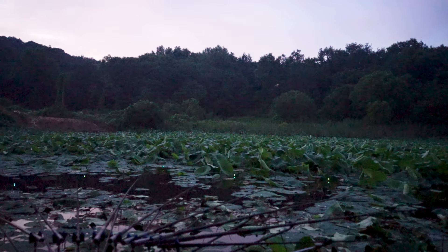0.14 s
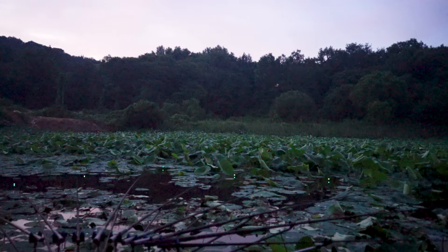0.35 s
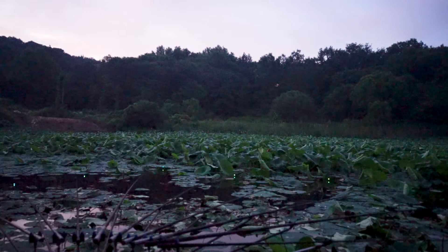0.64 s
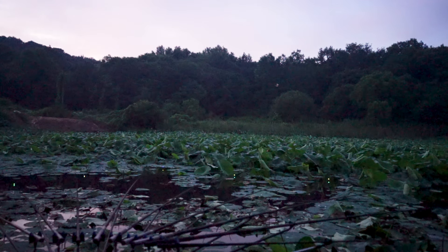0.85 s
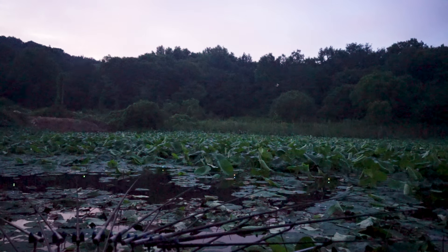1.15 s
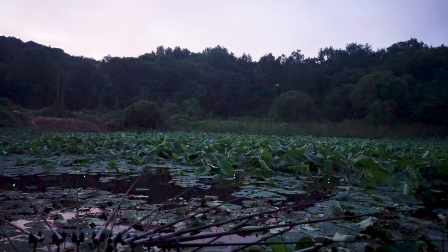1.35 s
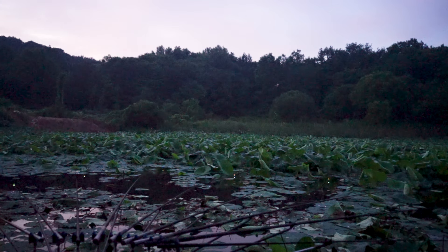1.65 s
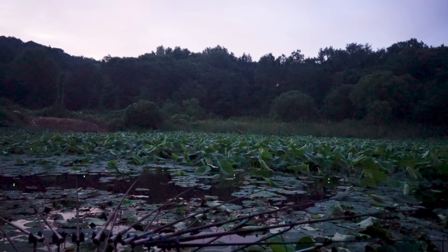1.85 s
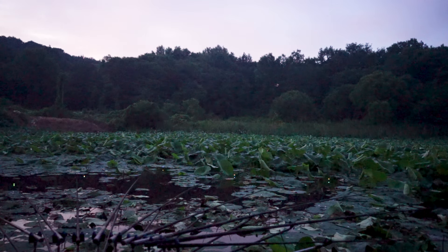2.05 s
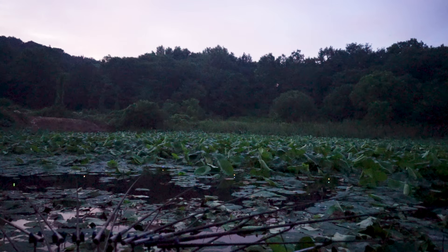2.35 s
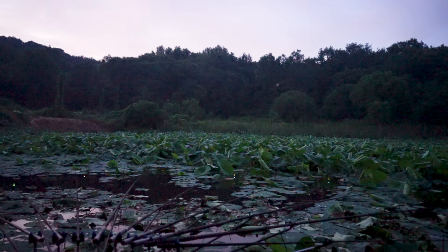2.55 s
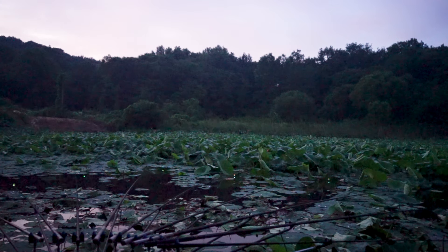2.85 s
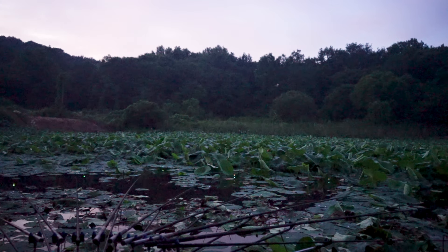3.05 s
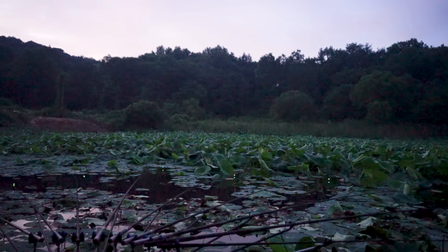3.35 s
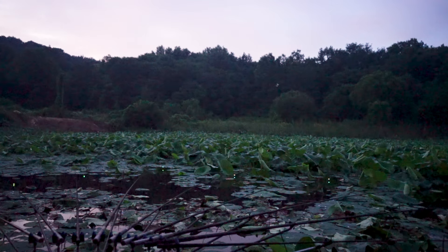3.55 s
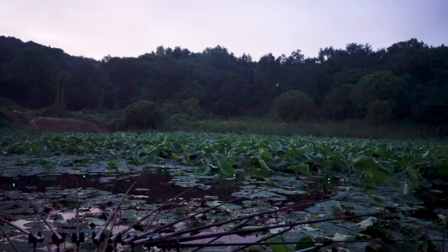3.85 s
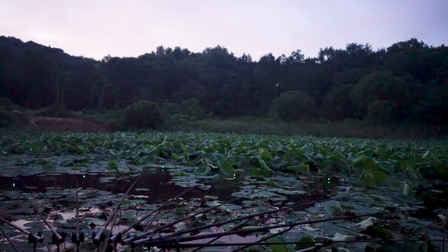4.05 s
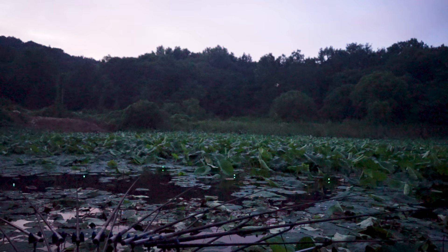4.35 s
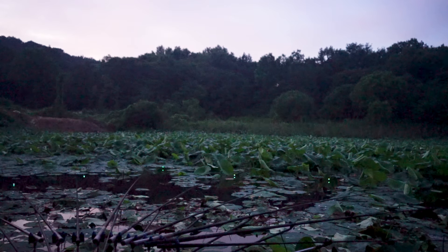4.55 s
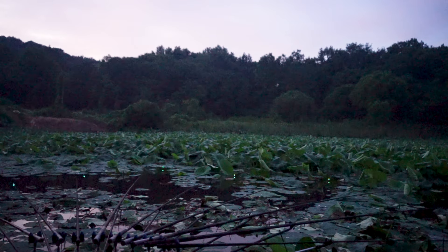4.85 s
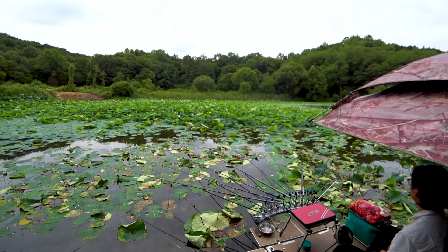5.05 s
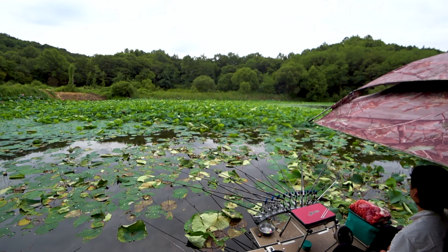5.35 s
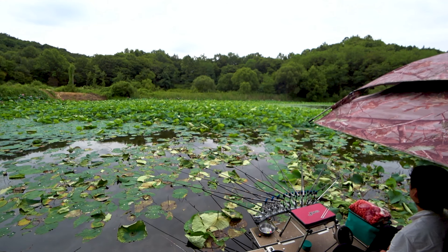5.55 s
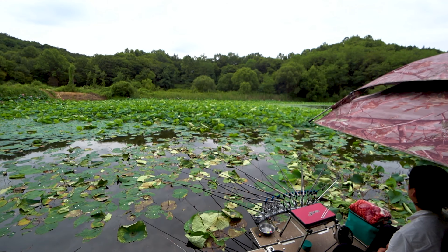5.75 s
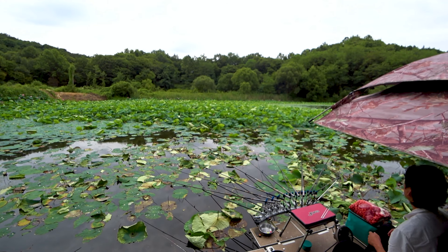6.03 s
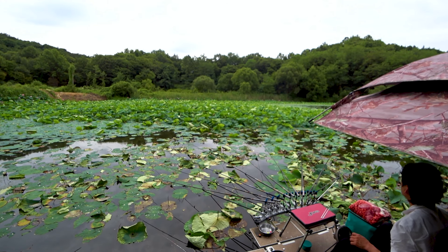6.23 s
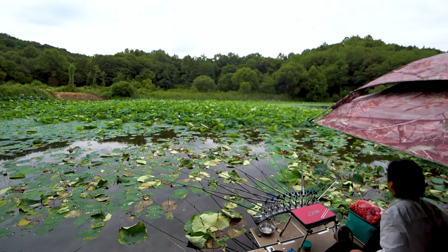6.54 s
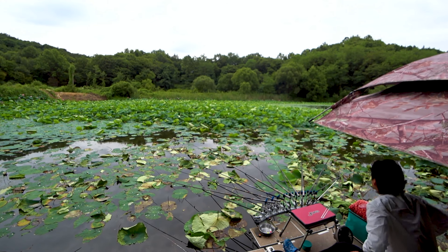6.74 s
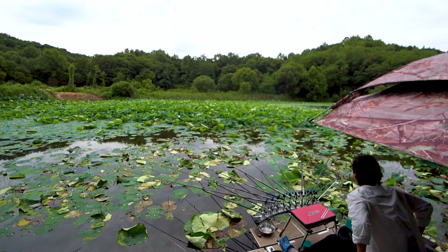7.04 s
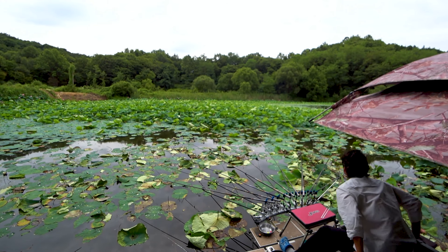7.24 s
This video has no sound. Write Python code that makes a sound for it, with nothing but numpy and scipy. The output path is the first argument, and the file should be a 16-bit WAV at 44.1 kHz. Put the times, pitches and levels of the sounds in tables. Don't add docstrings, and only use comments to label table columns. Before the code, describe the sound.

A quiet lily pond among wooded hills, heard in open stereo with short blurred echoes from trees and banks. From 0 to 0.8 s a near thrush, slightly left, gives a rattle, a falling slur and two bright hoarse chirps, with thin whistles around it. At 1.1 s a buzzing call stutters downward; from 1.5 to 2.9 s sharp dry ticks repeat on the left while raspy, warbled calls and piping whistles overlap. Around 3.5 to 4.3 s the thrush returns more softly with rattle, slur and chirps. A weaker buzz comes at 4.6 s, then sparse far whistles and faint cricket chirps. From 5.9 s handled gear makes small clicks and rustles, denser near 7 s; a two-note whistle calls at 6.7 and 7.1 s. Throughout, low hum, faint throbbing insects, far twitter and fading hiss; traffic slowly nears.

```python
import sys
import numpy as np
from scipy import signal
from scipy.fft import rfft, irfft, next_fast_len
from scipy.io import wavfile
from scipy.ndimage import uniform_filter1d

SR = 44100
rng = np.random.default_rng(int(sys.argv[2]) if len(sys.argv) > 2 else 0)


def linear_from_db(decibels):
    return 10 ** (np.asarray(decibels, float) / 20)


def inscribe(sig):
    pcm = np.round(np.clip(np.atleast_2d(sig).T, -1, 1) * 32767)
    wavfile.write(sys.argv[1], SR, pcm.astype(np.int16))


N = 325899
T = np.arange(N) / SR

# multiple, level_db
CLEAR_OVERTONES = [(2, -27.5), (3, -39), (4, -30.5), (5, -27.5)]


def rms_one(x):
    return x / np.sqrt(np.mean(x ** 2) + 1e-20)


def drift(rate_hz, size=N):
    r = np.exp(-2 * np.pi * rate_hz / SR)
    noise = rng.standard_normal(size + 4000)
    return rms_one(signal.lfilter([1], [1, -2 * r, r * r], noise)[4000:])


def ring(x, hz, width_hz):
    r = np.exp(-np.pi * width_hz / SR)
    zeros = np.array([1, 0, -1]) * (1 - r * r) / 2
    return signal.lfilter(zeros, [1, -2 * r * np.cos(2 * np.pi * hz / SR), r * r], x)


def running_phase(hz):
    return 2 * np.pi * np.cumsum(hz) / SR


def add(track, start_s, sound):
    i = round(start_s * SR)
    track[i:i + len(sound)] += sound[:N - i]


def whistles(notes, swell, overtones=(), hoarse_hz=0):
    out = np.zeros(N)
    shake_hz = hoarse_hz * drift(90)
    for start_s, length_s, first_hz, middle_hz, last_hz, level_db in notes:
        u = np.linspace(0, 1, round(length_s * SR))
        bend = np.polyfit([0, .5, 1], [first_hz, middle_hz, last_hz], 2)
        phase = running_phase(np.polyval(bend, u))
        rough = phase + running_phase(np.resize(shake_hz[round(start_s * SR):], len(u)))
        tone = np.sin(.85 * phase + .15 * rough)
        tone = tone + sum(linear_from_db(db) * np.sin(round(k) * rough) for k, db in overtones)
        add(out, start_s, linear_from_db(level_db) * np.sin(np.pi * u).clip(0) ** swell * tone)
    return out


def glides(rows, early=.61):
    return [(s, length, a, a + early * (b - a), b, db) for s, length, a, b, db in rows]


def sung(motif, times):
    return [(s + at, *pitch, db + loud) for at, loud in times for s, *pitch, db in motif]


def crested(rows, climb, tip, crest, octave_db=-40):
    out = np.zeros(N)
    for start_s, length_s, crest_hz, level_db in rows:
        u = np.linspace(0, 1, round(length_s * SR))
        rise = climb * np.abs(1 - u / crest) ** 2.2
        fall = tip * ((u - crest) / (1 - crest)) ** 2
        phase = running_phase(crest_hz * (1 - np.where(u < crest, rise, fall)))
        swell = np.sin(np.pi * u ** 0.82).clip(0) ** 0.44
        add(out, start_s, linear_from_db(level_db) * swell * (np.sin(phase) + linear_from_db(octave_db) * np.sin(2 * phase)))
    return out


def warbles(tables, rate_hz, uneven, low_db, overtones, higher=1, wider=1):
    out = np.zeros(N)
    for rows in tables:
        s, centre_hz, swing_hz, level_db = np.transpose(rows)
        t = np.arange(s[0], s[-1], 1 / SR)
        shake = np.cos(running_phase(rate_hz * (1 + uneven * drift(56.9, size=len(t)))))
        shake = np.tanh(0.87 * shake)
        centre = higher * np.interp(t, s, centre_hz)
        phase = running_phase(centre + wider * np.interp(t, s, swing_hz) * shake)
        tone = np.sin(phase) + sum(linear_from_db(db) * np.sin(round(k) * phase) for k, db in overtones)
        loud_db = np.interp(t, s, level_db) - low_db * shake + 2.9 * drift(70, size=len(t))
        add(out, s[0], linear_from_db(loud_db) * tone)
    return out


def among_trees(x, lean_db, lag_s, wet_db, t60, echo_db, shadow_db=0, echoes=None, blur=.15, dull_db=0):
    # delay_s, level_db
    pond_echoes = [(.007, 4.5), (0.012, 3), (0.027, -3.5), (0.039, -6), (0.059, -9.5), (.125, -9)]
    t = np.arange(SR) / SR
    scatter = rng.standard_normal((2, SR)) * linear_from_db(3 * rng.exponential(1, (2, SR)).clip(0, 4))
    tail = scatter * linear_from_db(-60 * t / t60) * (1 - np.exp(-t / 0.0003))
    path = linear_from_db(wet_db) * tail / np.sqrt(np.sum(tail ** 2, axis=1, keepdims=True))
    for delay_s, db in pond_echoes if echoes is None else echoes:
        cluster = scatter * np.exp(-((t - delay_s) / (blur * delay_s)) ** 2)
        path += linear_from_db(db + echo_db) * cluster / np.sqrt(np.sum(cluster ** 2, axis=1, keepdims=True))
    size = next_fast_len(N + SR)
    hz = np.arange(size // 2 + 1) * SR / size
    direct = np.exp(-2j * np.pi * hz * np.array([[0], [lag_s]]))
    leaves = linear_from_db(-dull_db * ((hz - 2300) / 800).clip(0, 1))
    lean = lean_db + shadow_db * (hz / 13000).clip(0, 1) ** 2
    path = (direct + leaves * rfft(path, size)) * linear_from_db(lean * np.array([[.5], [-.5]]))
    return irfft(rfft(x, size) * path, size)[:, :N]


def bed(spectrum, level_db, patchy_db):
    # pitch_hz, left_right_likeness
    likeness = [(60, 0.35), (130, 0.54), (290, 0.37), (640, 0.51), (1410, 0.3), (3100, 0.0013),
                (6820, 0.12), (15000, 0.078)]
    like_hz, like = np.transpose(likeness)
    point_hz, point_db = np.transpose(spectrum)
    out, white = 0, rng.standard_normal((2, 2, N))
    edges = point_hz[0] * 2 ** np.arange(0, np.log2(point_hz[-1] / point_hz[0]) + .2, 1 / 3)
    for k, (low, high) in enumerate(zip(edges, edges[1:])):
        band = signal.butter(2, [low, high], "band", fs=SR, output="sos")
        mid, side = signal.sosfilt(band, white[k % 2])
        log_hz = np.log(np.sqrt(low * high))
        alike = np.clip(np.interp(log_hz, np.log(like_hz), like), -1, 1)
        flicker_db = patchy_db * drift(22 * 16, size=N // 16 + 2)
        gain = linear_from_db(np.interp(log_hz, np.log(point_hz), point_db) + flicker_db)
        gain = np.interp(T * SR / 16, np.arange(len(gain)), gain)
        out = out + gain * (np.sqrt(1 + alike) * mid + np.sqrt(1 - alike) * side * [[1], [-1]])
    return linear_from_db(level_db) * rms_one(out)


def air(dawn_db, nearing_db, chorus_db):
    # pitch_hz, level_db per Hz
    rumble_bands = [(15, -49), (25, -22), (49, -13.5), (92, -5), (198, -6), (500, -9), (650, -4.5),
                    (1100, -120)]
    traffic_bands = [(240, -8), (400, -4), (611, -1.5), (927, 6.5), (1540, -1.5), (1900, 2), (2470, -37),
                     (4180, -120)]
    chorus_bands = [(1700, -25), (2250, 7.5), (3590, 0.5), (4200, 0), (5190, -5), (6530, -0.5), (9000, -80),
                    (11700, -49)]
    hiss_bands = [(4410, -35), (7500, -12), (8400, -8.5), (12200, -12.5), (14700, -11), (16200, -20)]
    rumble_db = -56.5 + 1.07 * dawn_db
    hiss_db = -57 + 2.05 * dawn_db + 2.47 * nearing_db
    out = bed(rumble_bands, rumble_db, 0.22) * linear_from_db([[1.2], [-1.2]])
    out = out + bed(traffic_bands, -59.5 + nearing_db, 0.91)
    out = out + bed(chorus_bands, chorus_db - 2.1, 3.47) * linear_from_db([[.8], [-.8]])
    out = out + bed(hiss_bands, hiss_db, 0.57)
    return out + linear_from_db(rumble_db - 8 + 2.5 * drift(4)) * np.sin(2 * np.pi * 97 * T)


def twitter(level_db):
    notes = []
    for when, pitch, bend, length, soft in rng.random((400, 5)):
        hz = 2300 * 2 ** (.6 * pitch)
        b = 1 + .2 * (bend - .7)
        notes.append((7.3 * when, .03 + .05 * length, hz, hz * b, hz * b ** 1.6, -8 * soft))
    return linear_from_db(level_db) * rms_one(whistles(notes, 0.22))


def katydids():
    throb = np.clip(np.sin(2 * np.pi * 25.5 * T) + .1, 0, 1) * linear_from_db(3 * drift(1.2))
    low, high = [rms_one(ring(ring(rng.standard_normal(N), hz, 260), hz, 260)) for hz in (4900, 12900)]
    return linear_from_db(-55 - .6 * T) * throb * low + linear_from_db(-73 - 1.2 * T) * high


def rustles():
    # start_s, peak_db, centre_hz, length_s
    touches = [(1.281, -33, 566, 0.028), (1.488, -44, 3500, 0.0094), (5.931, -37.5, 2940, 0.022),
               (5.932, -40, 890, 0.047), (5.967, -50, 5800, .005), (6.013, -43, 5100, 0.005),
               (6.302, -39, 970, 0.0084), (6.563, -45, 1170, 0.021), (6.654, -37, 2360, 0.012),
               (6.922, -37.5, 4700, 0.023), (6.949, -32, 4740, 0.0044), (7.003, -36, 6000, 0.0044),
               (7.014, -30, 2660, 0.011), (7.117, -34.5, 4430, 0.018), (7.285, -37.5, 437, 0.023),
               (7.286, -33.5, 3160, 0.0061), (7.36, -42, 4000, 0.005)]
    out = np.zeros(N)
    u = np.arange(4000) / SR
    for start_s, peak_db, hz, length_s in touches:
        grains = rng.standard_normal(4000) * linear_from_db(2 * rng.exponential(1, 4000))
        grains = grains * np.exp(-(u / length_s) ** 2)
        burst = ring(ring(grains, hz, 1.25 * hz), hz, 1.25 * hz)
        add(out, start_s, linear_from_db(peak_db) * burst / np.sqrt(np.sum(burst ** 2) / (length_s * SR)) / 4)
    return out


def ticks():
    # start_s, level_db
    tick_times = [(1.514, -25.5), (1.6672, -39), (1.86, -25), (1.959, -40), (2.141, -25.5), (2.28, -38.5),
                  (2.47, -28), (2.5698, -40), (2.7437, -27.5), (2.847, -40), (6.742, -41.5), (7.06, -42),
                  (7.323, -46)]
    snaps = np.zeros(N) + 1e-18
    u = np.arange(60)
    for start_s, level_db in tick_times:
        add(snaps, start_s, [linear_from_db(level_db + 20.5)])
        add(snaps, start_s + .003, linear_from_db(level_db + 8.5) * rng.standard_normal(60) * np.exp(-u / 25))
    return ring(snaps, 10460, 2140) + 0.17 * ring(snaps, 21000, 3000)


def right_bank():
    # start_s, length_s, first_hz, last_hz, peak_db
    glide_rows = [(3.255, 0.037, 2680, 2360, -60), (3.185, 0.023, 2000, 1830, -56),
                  (3.4, 0.0078, 3000, 2160, -64), (5.4, 0.068, 1970, 2176, -57),
                  (5.46, 0.063, 2400, 1880, -55.5), (5.6, 0.059, 3650, 3680, -59),
                  (6.25, 0.055, 2760, 2383, -52), (2.04, 0.1, 2687, 2387, -35.5),
                  (2.385, 0.043, 2904, 1977, -36.5), (2.44, 0.035, 2257, 2096, -38),
                  (3.3, 0.12, 8300, 8300, -56), (3.47, 0.038, 6400, 3800, -50),
                  (4.85, 0.091, 3800, 4730, -48.5), (4.88, 0.089, 3760, 2950, -44.5),
                  (4.96, 0.13, 3010, 2630, -44), (5.235, 0.072, 1957, 2970, -48),
                  (5.285, 0.027, 2915, 2300, -42), (5.3, 0.066, 2290, 2050, -48),
                  (5.642, 0.0107, 6600, 4970, -44.5), (5.652, 0.011, 5300, 5100, -45),
                  (6.56, 0.058, 4010, 4460, -60), (5.66, 0.11, 3180, 2640, -49.5),
                  (6.11, 0.066, 2926, 2640, -48), (6.27, .04, 2545, 2490, -55),
                  (4.67, 0.054, 2300, 1880, -48.5), (1.92, 0.056, 4340, 4400, -45),
                  (1.99, 0.063, 4550, 4560, -57)]
    # start_s, length_s, crest_hz, peak_db
    far_hoops = [(.5, 0.13, 6020, -43), (3.09, 0.17, 6080, -48), (6.065, 0.16, 6150, -60)]
    # start_s, level_db
    cricket_times = [(5.43, -65), (5.86, -65), (6.4, -66)]
    cricket = sung([(0, .093, 11300, 11300, 0)], cricket_times)
    out = whistles(glides(glide_rows + cricket), 0.18)
    out += crested(far_hoops, .3, .32, .7)
    return out * linear_from_db(3.5 * drift(60) - 1)


def left_bank():
    # start_s, length_s, first_hz, last_hz, peak_db
    glide_rows = [(.17, 0.11, 3860, 4470, -47), (.25, 0.035, 1950, 1770, -47.5),
                  (.58, 0.021, 4500, 3500, -48), (1.055, 0.11, 3750, 4710, -43.5),
                  (2.56, 0.039, 2700, 2380, -46.5), (2.275, 0.017, 3080, 2845, -40.5),
                  (2.6, 0.058, 1950, 1790, -55), (2.66, 0.12, 2340, 2667, -49),
                  (3.17, 0.043, 2650, 2300, -55), (2.78, 0.065, 3960, 4610, -39),
                  (3.09, 0.05, 2850, 2150, -62), (3.482, .02, 3050, 3050, -42),
                  (3.82, 0.034, 3380, 2800, -49), (5.74, 0.12, 3660, 4700, -51),
                  (5.865, 0.055, 2450, 1880, -57), (6.025, 0.047, 2150, 1960, -52),
                  (3.59, 0.043, 3700, 3700, -53), (3.72, 0.036, 3250, 2950, -52),
                  (6.26, 0.081, 2650, 1900, -55), (6.35, 0.092, 2140, 1760, -56)]
    # start_s, length_s, first_hz, last_hz, level_db
    call = [(0, 0.049, 2803, 2670, -2), (.035, 0.051, 2730, 2550, 2), (.085, 0.013, 2400, 1880, -7),
            (.11, .045, 1830, 1950, -13.5), (.145, 0.015, 2387, 2180, -9)]
    # start_s, length_s, crest_hz, level_db
    call_end = (.157, .062, 2210, 1.7)
    # start_s, level_db
    call_times = [
        (6.698, -35.5),
        (7.12, -37.5),
    ]
    # start_s, length_s, crest_hz, peak_db
    hoops = [(.015, 0.08, 6620, -44.5), (1.4, 0.082, 6130, -42.5), (2.46, 0.13, 6520, -47.5),
             (2.79, 0.12, 7430, -51), (3.37, 0.21, 6610, -52), (3.7, 0.16, 7400, -62),
             (4.055, 0.11, 6550, -52), (4.4, 0.12, 7400, -56.5), (5.15, 0.13, 6050, -53.5)]
    pipes = [(.48, 0.088, 3714, -37), (.68, 0.02, 3770, -45), (.785, 0.11, 3760, -36.5),
             (1.535, 0.097, 3706, -45.5), (2.165, 0.094, 3700, -38.5), (2.495, 0.087, 3673, -38),
             (2.61, 0.079, 3740, -40.5), (4.47, 0.098, 3706, -43.5), (4.58, 0.1, 3745, -44),
             (5.165, 0.078, 3670, -44.5), (5.47, 0.083, 3714, -44.5)]
    out = whistles(glides(glide_rows) + glides(sung(call, call_times), 0.464), 0.22, CLEAR_OVERTONES)
    out += crested(hoops, .29, .3, .75)
    out = out * linear_from_db(3.5 * drift(60) - 1)
    out += crested(pipes, .085, .08, .78, octave_db=-25)
    return out + crested(sung([call_end], call_times), -.025, .19, .45)


def rasp_paths(rows, swing):
    # share_of_length, share_of_sweep, level_db
    rasp_shape = [(0, 0.011, -13.5), (0.221, .5, -4), (0.649, .92, -3), (1, 0.93, -15)]
    return [[(s + u * length, a + done * (b - a), swing * (a + b) / 2, db + d) for u, done, d in rasp_shape]
            for s, length, a, b, db in rows]


def rasps():
    # start_s, length_s, first_hz, last_hz, level_db
    rising = [
        (2.06, 0.17, 6050, 7230, -34),
        (2.07, 0.083, 3860, 4960, -31.5),
    ]
    falling = [
        (2.705, 0.064, 7930, 4700, -36.5),
        (2.76, 0.15, 5580, 4430, -40.5),
        (3.15, 0.14, 6970, 4970, -45.5),
    ]
    # start_s, centre_hz, swing_hz, level_db
    warbled = [
        [(1.676, 7300, 60, -48), (1.69, 8070, 90, -48), (1.706, 8130, 200, -38), (1.716, 5820, 705, -31.5),
         (1.75, 6090, 880, -26.5), (1.785, 6210, 730, -39.5), (1.83, 6100, 604, -51)],
        [(1.825, 5600, 300, -45), (1.85, 4870, 355, -30), (1.885, 3723, 460, -30.5), (1.915, 3574, 800, -34),
         (1.96, 3400, 1010, -34.5), (2.0, 3360, 980, -48), (2.04, 3600, 900, -50)],
    ]
    sweeps = rasp_paths(rising, .06) + rasp_paths(falling, .19)
    out = warbles(sweeps, rate_hz=300, uneven=0.21, low_db=2.0, overtones=[(2, -17.5)])
    return out + warbles(warbled, rate_hz=170, uneven=0.6, low_db=-2.0, overtones=[(2, -14.0), (3, -19.5)])


def buzz_paths():
    # middle_s, pitch_hz
    syllables = [(0.035, 6510), (0.101, 6320), (0.164, 6000), (.22, 5740), (0.28, 5420)]
    # start_s, level_db, first_dip_db, last_dip_db, fade_db
    buzz_times = [
        (1.076, -27, 4.2, 20, 2.2),
        (4.633, -32, 19, 17, 4.7),
    ]
    swing_hz, end_s, edge_db, hold_s = 290, .036, 28, .036
    s, hz = np.transpose(syllables)
    gap_s, gap_hz = (s[1:] + s[:-1]) / 2, (hz[1:] + hz[:-1]) / 2
    paths = []
    for at, level_db, first_dip_db, last_dip_db, fade_db in buzz_times:
        points = [(-.004, 0.94 * hz[0], edge_db), (s[-1] + end_s, hz[-1], edge_db)]
        points += zip(gap_s, gap_hz, np.linspace(first_dip_db, last_dip_db, len(s) - 1))
        points += zip(s - hold_s / 2, hz, 0 * s)
        points += zip(s + hold_s / 2, hz, 0 * s)
        paths.append([(at + t, f, swing_hz, level_db - dip - fade_db * t / s[-1])
                      for t, f, dip in sorted(points)])
    return paths


def two_voiced_buzz():
    paths = buzz_paths()
    low = warbles(paths, rate_hz=180, uneven=0.246, low_db=-4.5, overtones=[(2, -16)])
    high = warbles(paths, rate_hz=240, uneven=.38, low_db=1.5, overtones=[(2, -11)], higher=1.27, wider=2.2)
    size = np.sqrt(uniform_filter1d(low ** 2, size=600) + 1e-9)
    return low + linear_from_db(-8.5) * high + linear_from_db(-11.5) * ring(low * high / size, 14800, 8100)


def thrush():
    # start_s, length_s, first_hz, last_hz, level_db
    chirp = [(-.001, 0.01, 3514, 3430, -9.5), (.005, .007, 3430, 2580, -4),
             (.011, 0.014, 2580, 2400, -11.5), (.02, .031, 3147, 3029, 3), (.049, 0.0084, 2970, 2440, -2.5),
             (.054, .027, 2450, 2140, 2), (.079, .016, 2117, 1916, -6)]
    slur = [
        (.002, 0.055, 2637, 2437, -2.5),
        (.046, 0.053, 2455, 2324, 0.5),
    ]
    # start_s, centre_hz, swing_hz, level_db
    rattle = [(-.008, 3150, 80, -26), (0, 3590, 480, 3.5), (.01, 3103, 900, 1.5), (.035, 2924, 730, -6),
              (.058, 2680, 544, -9.5), (.078, 2745, 450, -27)]
    # start_s, level_db
    chirp_times = [(0.399, -17), (0.722, -16.5), (3.924, -21), (4.258, -22)]
    slur_times = [(0.127, -19.5), (3.629, -22)]
    rattle_times = [(0, -22.5), (3.506, -24)]
    # multiple, level_db
    harsh_overtones = [(2, -33), (3, -35), (4, -30), (5, -35)]
    chirps = whistles(glides(sung(chirp, chirp_times), .58), .35, harsh_overtones, hoarse_hz=120)
    slurs = whistles(glides(sung(slur, slur_times), .56), .35, CLEAR_OVERTONES, hoarse_hz=4)
    paths = [[row for row in sung(rattle, [at]) if row[0] >= 0] for at in rattle_times]
    rattles = warbles(paths, rate_hz=190, uneven=0.305, low_db=2.0, overtones=harsh_overtones)
    return chirps * linear_from_db(1.5 * drift(110)) + slurs * linear_from_db(1.5 * drift(25)) + rattles


def scene():
    # time_s, level_db
    dawn_curve = [(0, -1), (1.38, -0.64), (6.25, -10), (7.39, -14.5)]
    # time_s, level_db
    nearing_curve = [(0, .5), (1.38, 0), (6.25, 4), (7.39, 9.5)]
    # delay_s, level_db
    perch_echoes = [(.007, -7.5), (.013, -5), (.027, -8.5), (.04, -7.5), (.061, -8), (.085, -17.5),
                    (.125, -30)]
    dawn_db, nearing_db = [np.interp(T, *np.transpose(curve)) for curve in (dawn_curve, nearing_curve)]
    chorus_db = -44 + 1.16 * dawn_db + 0.34 * nearing_db
    return (air(dawn_db, nearing_db, chorus_db)
            + among_trees(twitter(chorus_db - 23), 1.1, .0001, wet_db=3, t60=.7, echo_db=0)
            + among_trees(rustles(), -2.9, -0.000011, wet_db=-8.0, t60=1.0, echo_db=-30)
            + among_trees(ticks(), 15.2, 0.00047, wet_db=-18.5, t60=0.22, echo_db=-26)
            + among_trees(right_bank() + katydids(), -1.5, -.0001, wet_db=-10, t60=.5, echo_db=-11)
            + among_trees(left_bank(), 5.8, 0.00013, wet_db=-7.0, t60=0.21, echo_db=-11.5)
            + among_trees(two_voiced_buzz() + rasps(), .1, .00012, wet_db=-9, t60=.16, echo_db=-11, shadow_db=6)
            + among_trees(thrush(), 3.2, .000112, wet_db=-15.5, t60=0.92, echo_db=1,
                          echoes=perch_echoes, blur=0.084, dull_db=2.0))


def drop_masked(x):
    mask_db, up_db, down_db, treble_db = 32.5, 21, 50, 9.5
    hz, _, cells = signal.stft(x, SR, nperseg=1024)
    power = uniform_filter1d(np.mean(np.abs(cells) ** 2, axis=0), size=9, axis=0)
    db = 10 * np.log10(np.abs(power) + 1e-20)
    octave = np.log2(hz[:, None] + 500)
    up = np.maximum.accumulate(db + up_db * octave, axis=0) - up_db * octave
    down = np.maximum.accumulate((db - down_db * octave)[::-1], axis=0)[::-1] + down_db * octave
    margin_db = mask_db - treble_db * (octave - np.log2(4000)).clip(0)
    kept = np.clip((db - np.maximum(up, down) + margin_db) / 3, 0, 1)
    return signal.istft(cells * kept, SR, nperseg=1024)[1][:, :N]


def roll_off(x):
    return signal.sosfilt(signal.butter(12, 16010, fs=SR, output="sos"), x)


def record(dry):
    top_cut = signal.cheby2(14, 60, 16400, fs=SR, output="sos")
    mix = drop_masked(signal.sosfilt(top_cut, dry))
    return roll_off(mix)


dry = scene()
out = record(dry)
inscribe(out)
```